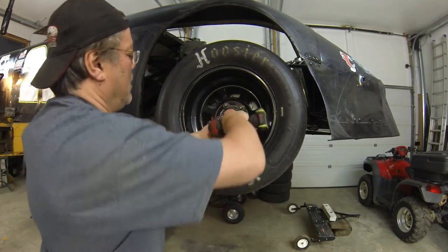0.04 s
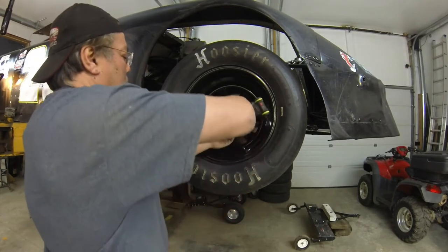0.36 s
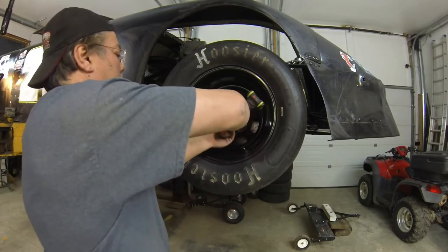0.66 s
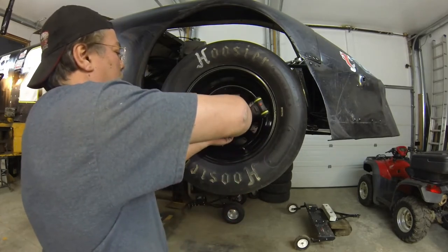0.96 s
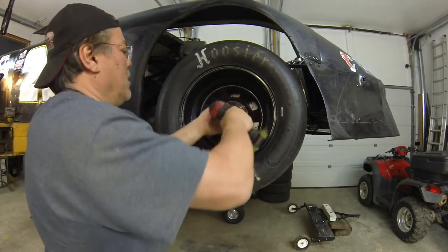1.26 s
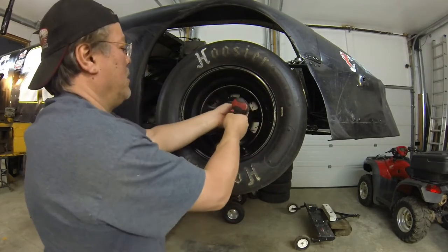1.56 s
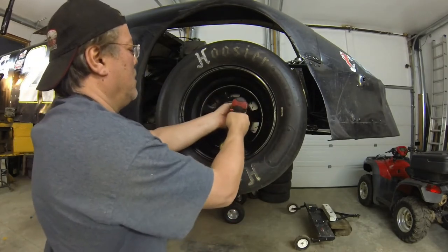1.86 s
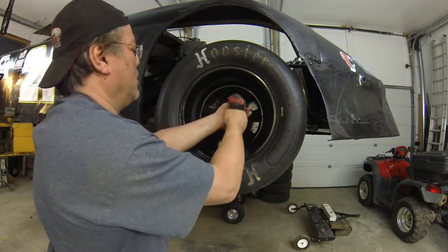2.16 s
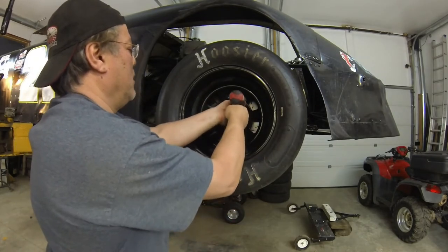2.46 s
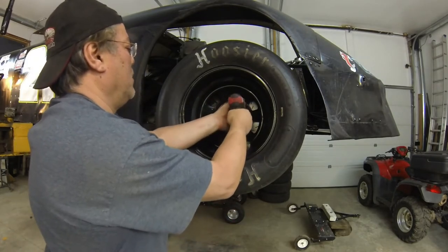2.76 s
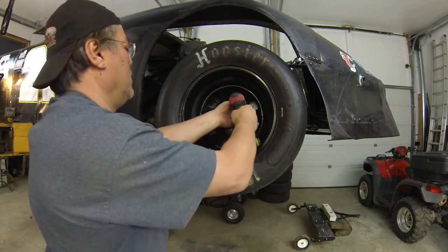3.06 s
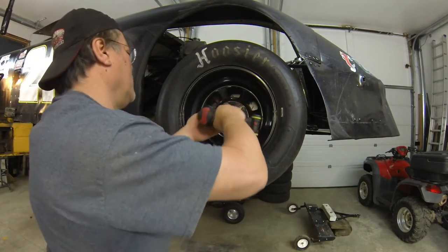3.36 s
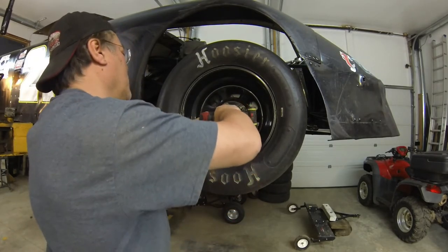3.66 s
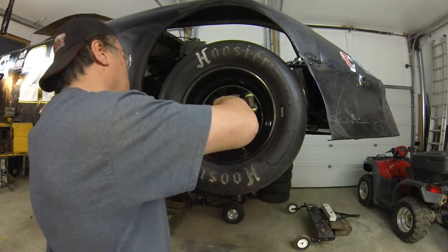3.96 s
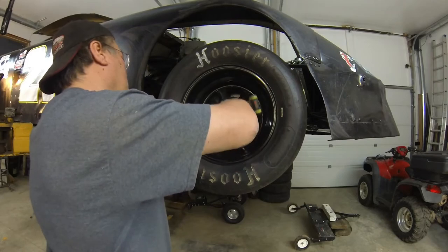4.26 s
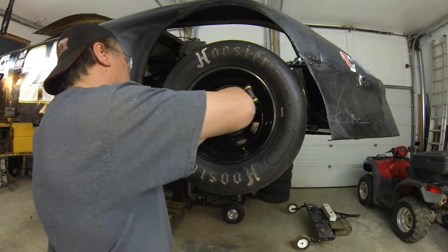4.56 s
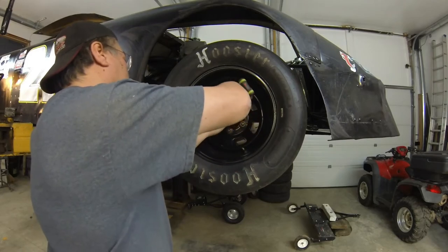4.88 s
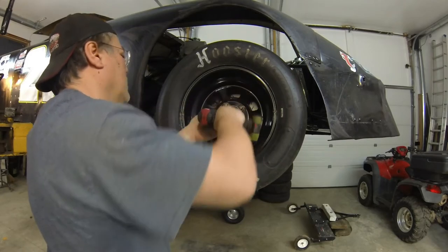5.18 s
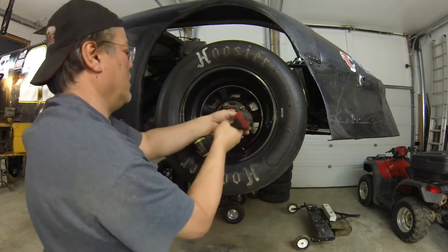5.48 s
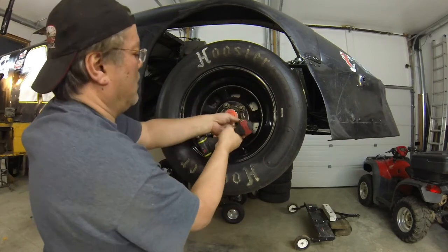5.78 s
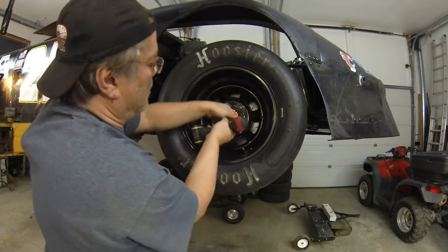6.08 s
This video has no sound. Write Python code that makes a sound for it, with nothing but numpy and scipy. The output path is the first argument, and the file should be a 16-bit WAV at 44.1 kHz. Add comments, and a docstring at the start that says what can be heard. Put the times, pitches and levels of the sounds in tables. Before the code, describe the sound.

Close to a steel car wheel in a quiet, reverberant garage, a metal socket knocks onto a lug nut, and a cordless impact wrench whirs, rattles and hammers for a moment. This happens three times, about two seconds apart, with ringing clanks, small scrapes and faint taps in between as the tool moves on and the tyre rumbles softly. Finally the socket clatters onto another nut without the motor starting.

```python
"""A garage, one microphone close to a steel car wheel, the room's still air behind it.
A cordless impact wrench runs three lug nuts home. The tyre rumbles as the tool shoves it; the
socket clacks onto each nut and sets the wheel ringing. The gears whine up, the socket rattles,
and the hammer strikes about fifty times a second. The room answers from farther off."""
import sys
import numpy as np
from scipy import signal
from scipy.io import wavfile
from scipy.ndimage import uniform_filter1d

SR = 44100
rng = np.random.default_rng(int(sys.argv[2]) if len(sys.argv) > 2 else 0)


def dump_mix(stems):
    """Bounce the given channels to the path in sys.argv[1] as a 16-bit WAV at rate SR."""
    frames = np.atleast_2d(stems).T  # one column per channel
    limited = np.clip(frames, -1, 1)  # hard clip at full scale
    pcm = np.round(limited * 32767).astype(np.int16)
    wavfile.write(sys.argv[1], SR, pcm)


N = 274726
TIME = np.arange(N) / SR
EDGES = 20 * 2 ** (np.arange(30) / 3)   # third octaves, Hz
CENTRES = np.sqrt(EDGES[1:] * EDGES[:-1])
BANK = [signal.butter(2, pair, "band", fs=SR, output="sos") for pair in zip(EDGES, EDGES[1:])]

# Room tone. Each row: frequency in Hz, density in dB.
AIR_SPECTRUM = [(22, -4), (50, 1.5), (90, 0), (200, -9.5), (400, -20.5), (1000, -26.5), (2500, -30.5),
                (5000, -35), (10000, -42), (12500, -52), (15500, -83)]
# The tool shoves the tyre. Each row: start in seconds, level in dB.
SHOVES = [(0, -39), (.08, -39.5), (.57, -47), (1.58, -42.5), (1.85, -40), (2.22, -49), (2.7, -45),
          (3.64, -43.5), (4.25, -36), (5.79, -34), (6.13, -43)]
# Tyre and hub resonances. Each row: frequency in Hz, width in Hz, gain in dB.
TYRE_MODES = [(78.5, 6.4, 5), (102, 8.6, -1.5), (139, 65, -6), (180, 17, 0.5), (258.8, 13, -6.5),
              (417, 37, -13), (610, 83, -18.5)]

# Socket against nut and wheel. Each row: start in seconds, level, weight and clang in dB,
# clang pitch in Hz, brightness and socket ring in dB.
KNOCKS = [(0.0681, -19, -12, 9.5, 1060, 1, 0.5), (0.1067, -23.5, 0, 5.5, 900, 0, -2.5),
          (0.1234, -29, 8, 6.5, 847, 6.5, -2.5), (.149, -27, 10, -1, 800, 3, -1.5),
          (0.3159, -36.5, 16, 12, 540, -6.5, -11.5), (.528, -55, 1, -5, 757, 4.5, -7),
          (1.5808, -14.5, -17, 9.5, 372, -8.5, -3.5), (1.818, -26, -5, 1, 706, -6, -2),
          (1.853, -35, 5, 4, 701, -7.5, -2.5), (2.461, -43, 0, 3, 760, 1.5, 3.5),
          (2.4705, -27, -5.5, 1, 837, 1, 4.5), (2.4737, -25.5, 4, -5.5, 703, -7.5, -4.5),
          (2.653, -47, 10, -6, 770, 6, 0), (3.6143, -25, -19.5, 14.5, 660, 4, -11.5),
          (3.6272, -26.5, -7.5, 5.5, 680, -1.5, -4), (4.2224, -48, 16, 20.5, 795, -15.5, 6.5),
          (4.2467, -35.5, 13, 13.5, 725, 1.5, 1.5), (4.3534, -31.5, -13, 7, 750, -1, -3),
          (4.471, -57.5, 0.5, -0.5, 759, 13, -1.5), (5.7716, -25.5, -7, 6.5, 760, 1, 6.5),
          (5.7854, -25, 0.5, 11.5, 716, 6, -7.5), (5.8205, -29.5, -2, 10, 696, 8.5, 0),
          (5.8271, -26, -7, -1, 750, 9, -3), (5.903, -43.5, 17.5, 12, 750, -11, -12),
          (6.1412, -52, 30, 11.5, 653, -29, -8)]
# The socket drags over the nut. Each row: start in seconds, level and brightness in dB, base decay in ms.
SCRAPES = [(1.7828, -37.5, 10, 14), (2.4355, -41.5, -11.5, 17)]
# All scrapes share weight and clang in dB, clang pitch in Hz, socket ring in dB.
SCRAPE_TONE = (2, 9, 1000, 1)
# Faint taps as the socket feels for a nut. Each row: start and end in seconds.
FUMBLES = [(2.2, 2.42), (3.95, 4.15), (6.08, 6.2)]
# All taps share these values: a row of KNOCKS without its start.
TAP_TONE = (-63.5, 13, 11, 850, -12, -6)
# Crack of one contact. Each row: frequency in Hz, density in dB.
CLACK_SPECTRUM = [(40, -17), (110, -0.5), (250, 5), (450, 3), (750, 0.5), (1200, -0.5), (1900, -0.5),
                  (2600, -1), (3800, -5), (5200, -10), (7500, -11.5), (10000, -19), (13000, -35),
                  (15500, -34.5)]
# Ringing steel of wheel and socket. Each row: frequency in Hz, level in dB, t60 in seconds.
WHEEL_MODES = [(551, -0.5, 0.19), (632, -1.5, 0.2), (713, -8, 0.45), (740, -3.5, 0.25), (794.6, 4.5, 0.081),
               (902, -2, 0.15), (1070, 0, 0.14), (1210, -7.5, 0.073), (1310, -10, 0.12), (1630, -4, .26),
               (1810, -4.5, 0.31), (1960, -7.5, .14)]
SOCKET_MODES = [(2540, 1, .22), (3300, -2, .25), (3416, 0, .33), (3530, 1, .3), (3800, -2, .27),
                (4850, -3, .13), (5050, 0, .18), (6800, -4, .24), (7140, -4, .23), (8120, -9, .25),
                (9340, -11.5, .1), (14080, -16.5, .22)]

# The room's reverberation. Each row: frequency in Hz, level in dB, t60 in seconds.
GARAGE_REVERB = [(90, -1.5, 2.1), (180, -2.5, 0.74), (397, -5.5, .72), (900, -10.5, 0.8), (1820, -5, 0.8),
                 (3200, -7.5, 0.81), (5240, -6.5, 0.74), (8050, -6.5, 0.42), (11100, -11.5, 0.59),
                 (14000, -10, 0.38)]
# Times in seconds when the tool moves to another place on the wheel.
MOVES = [1.45, 3.5, 5.6]

# The trigger. Each row: pull, release and spin-up time in seconds, whine level in dB.
PULLS = [(.558, .75, .05, -27), (2.687, 2.918, .045, -27), (4.497, 4.9, .075, -17)]
# Gear tones. Each row: multiple of the whine pitch, level in dB.
GEAR_ORDERS = [(1, -1), (1.33, -2), (3, -3), (4, -5)]
# Rattle of the spinning tool. Each row: frequency in Hz, density in dB.
RATTLE_SPECTRUM = [(100, -14), (400, -5), (1200, -2.5), (2400, -2), (3700, 0), (5500, -7), (10000, -12),
                   (13000, -23.5), (15500, -28.5)]

# The nut jolts as it is grabbed and as it seats.
# Each row: start in seconds, level, body and brightness in dB.
JOLTS = [(.568, -18.5, 5.5, -3.5), (.58, -19.5, 8.5, 2.5), (.591, -12.5, -5.5, -3), (.597, -24, 9.5, 0),
         (0.6171, -21.5, 4, -15), (0.634, -13.5, -10, -3.5), (0.7359, -25.5, -4, -0.5),
         (2.706, -15, 10.5, -4.5), (2.7575, -12, 5.5, -6), (2.7648, -19.5, 9, -5), (2.7713, -13, -1, 1),
         (4.512, -17.5, 2.5, -10), (4.521, -13, 9, .5), (4.5338, -12, 3, -1.5), (4.6609, -12, 1.5, -9.5),
         (4.673, -11, -2.5, -7.5)]
# Hammering on the seated nut, one run a pull.
# Each row: first and last blow in seconds, level, body and brightness in dB.
RUNS = [(.6538, 0.7122, -20, -14.5, 0.5), (2.792, 2.912, -20.5, 3.5, 2.5), (4.69, 4.862, -19.5, 1, 2.5)]
# Crack of one blow. Each row: frequency in Hz, density in dB.
BLOW_SPECTRUM = [(40, -28), (130, -20), (400, -11.5), (800, -10.5), (1200, -6.5), (1900, -4), (2700, 4),
                 (3800, -4), (5000, -5), (7000, -9), (10000, -9.5), (12500, -21.5), (15500, -32)]
BLOWS_PER_S = 51


def from_db(db):
    """Decibels to gain."""
    return 10 ** (np.asarray(db) / 20)


def rms_one(x):
    """Scale each row to rms 1."""
    return x / np.sqrt(np.mean(x ** 2, axis=-1, keepdims=True) + 1e-30)


def at_hz(points, hz, column=1):
    """Read one column of a table on a log-frequency axis."""
    points = np.array(points)
    return np.interp(np.log(hz), np.log(points[:, 0]), points[:, column])


def band(x, k):
    """Third-octave band k of x, with the power that white noise of rms 1 has there."""
    return rms_one(signal.sosfilt(BANK[k], x + 1e-18)) * np.sqrt(2 * (EDGES[k + 1] - EDGES[k]) / SR)


def coloured(noises, spectrum):
    """Shape two unrelated noises, dealt in turn to neighbouring bands; rms 1."""
    bands = (from_db(at_hz(spectrum, hz)) * band(noises[k % 2], k) for k, hz in enumerate(CENTRES))
    return rms_one(sum(bands))


def place(times, sounds):
    """Lay sounds on the time line."""
    out = np.zeros(N)
    for s, sound in zip(times, sounds):
        i = round(s * SR)
        out[i:i + len(sound)] += sound[:N - i]
    return out


def below(hz, corner_hz):
    """Smooth shelf: 1 under the corner, 0 above."""
    return 1 / (1 + (hz / corner_hz) ** 4)


def around(hz, centre_hz):
    """Smooth bump, about an octave wide: 1 at the centre, 0 far from it."""
    return np.exp(-2 * (2 * np.log2(hz / centre_hz)) ** 2 / np.pi)


def settle(start_s, time_s):
    """0 until the start, then an exponential approach to 1."""
    return 1 - np.exp(-np.maximum(TIME - start_s, 0) / time_s)


def room_tone(level_db=-57):
    """The still air of the garage: a low, steady hush all round the microphone."""
    return from_db(level_db) * coloured(rng.standard_normal((2, N)), AIR_SPECTRUM)


def tyre(rumble_db=-2, rise_s=.0089, fade_db_per_s=30):
    """Each shove stirs the low resonances of tyre and hub; the rumble swells quickly and fades."""
    rumble, power = 0, 0
    for hz, width_hz, db in TYRE_MODES:
        resonance = signal.iirpeak(hz, hz / width_hz, fs=SR)
        rumble += from_db(db) * signal.lfilter(*resonance, rng.standard_normal(N))
    rumble = signal.sosfilt(signal.butter(2, 55, "high", fs=SR, output="sos"), rumble)
    for s, db in SHOVES:
        fading = from_db(db - fade_db_per_s * np.maximum(TIME - s, 0))
        power += (settle(s, rise_s) * fading) ** 2
    return from_db(rumble_db) * np.sqrt(power) * rms_one(rumble)


def cracks(times, colour_db, decay_ms, linger_hz, damping, rise_ms=.3, size=4096):
    """Each impact excites a thicket of fast-dying modes; the low ones linger."""
    ms, out = np.arange(size) / SR * 1e3, 0
    for k, hz in enumerate(CENTRES):
        life_ms = np.maximum(decay_ms, .3)[:, None] * (1 + linger_hz / hz)
        envelope = (1 - np.exp(-ms / rise_ms)) * np.exp(-np.minimum(ms / life_ms, 20) ** damping)
        burst = band(rng.standard_normal((len(times), size)) * envelope, k) / np.sqrt(size)
        out += burst * from_db(colour_db(hz))[:, None]
    return place(times, out)


def ringing(times, strike_db, modes):
    """Struck steel rings on; every touch strikes each mode with a strength and sign of its own."""
    out, shape = np.zeros(N), (len(times), len(modes))
    strengths = from_db(2 * rng.standard_normal(shape)) * rng.choice([-1, 1], shape)
    for (hz, db, t60), strength in zip(modes, strengths.T):
        radius, angle = from_db(-60 / (t60 * SR)), 2 * np.pi * hz / SR
        clicks = place(times, (strength * from_db(db + strike_db(hz)))[:, None])
        feedback = [1, -2 * radius * np.cos(angle), radius ** 2]
        out += signal.lfilter([0, np.sin(angle)], feedback, clicks + 1e-18)
    return out


def contact_rows(decay_ms=2.8, tap_gap_s=.075):
    """Knocks, scrapes and unevenly spaced taps, as rows like KNOCKS plus a base decay in ms."""
    weight, clang, clang_hz, ring = SCRAPE_TONE
    knocks = [(*row, decay_ms) for row in KNOCKS]
    scrapes = [(s, level, weight, clang, clang_hz, bright, ring, ms) for s, level, bright, ms in SCRAPES]
    tap_times = np.concatenate([np.arange(start, end, tap_gap_s) for start, end in FUMBLES])
    taps = [(s + tap_gap_s * rng.random() / 2, *TAP_TONE, decay_ms) for s in tap_times]
    return knocks + scrapes + taps


def socket_contacts(crack_db=35, wheel_db=-15, socket_db=-23):
    """The socket knocks on the nut: a crack, then wheel and socket ring on."""
    times, level, weight, clang, clang_hz, bright, ring, decay_ms = np.transpose(contact_rows())

    def force_db(hz):
        """Heavy knocks add bass, sharp ones treble; the spot struck picks the pitch of the clang."""
        bass, treble = weight * below(hz, 430), bright * (1 - below(hz, 3400))
        return level + bass + clang * around(hz, clang_hz) + treble

    crack = cracks(times, lambda hz: crack_db + force_db(hz) + at_hz(CLACK_SPECTRUM, hz),
                   decay_ms, linger_hz=250, damping=.78)
    wheel = ringing(times, lambda hz: wheel_db + force_db(hz), WHEEL_MODES)
    socket = ringing(times, lambda hz: socket_db + level + ring, SOCKET_MODES)
    return crack + wheel + socket


def garage_echo(x, build_s=.003, early_db=-11, early_s=.0049, gap_s=.003):
    """Wheel arch and floor reach the microphone first; the diffuse tail swells and dies band by band."""
    t, tail = TIME[:SR], 0
    swelling = (1 - np.exp(-t / build_s)) * (t > gap_s)
    for k, hz in enumerate(CENTRES):
        dying = from_db(-60 * t / at_hz(GARAGE_REVERB, hz, column=2))
        tail += from_db(at_hz(GARAGE_REVERB, hz)) * band(rng.standard_normal(SR) * dying * swelling, k)
    early = rms_one(rng.standard_normal(SR) * (t > gap_s) * np.exp(-t / early_s))
    return signal.fftconvolve(x, (tail + from_db(early_db) * early) / np.sqrt(SR))


def drive(start_hz=550, free_hz=2300, loaded_hz=1750, bog_s=.03, brake_s=.022):
    """Whine pitch, whine gain and rattle gain: the motor spins up, bogs down on the nut and brakes."""
    db_per_octave, loaded_db = 13, -14   # the whine grows with speed and sinks under load
    rattle_db, rattle_rise_s = -29, .006
    grab_s, grab_db = .046, 6.5   # the socket rattles hardest just after it grabs the nut
    controls = np.zeros((3, N))
    for (pull, release, spin_up_s, whine_db), (first_blow, *_) in zip(PULLS, RUNS):
        load = settle(first_blow - 1 / BLOWS_PER_S, bog_s)
        power = (1 - settle(release, brake_s)) * (TIME > pull)
        unloaded_hz = start_hz + (free_hz - start_hz) * settle(pull, spin_up_s)
        hz = unloaded_hz + (loaded_hz - unloaded_hz) * load
        whine = from_db(whine_db + db_per_octave * np.log2(hz / free_hz) + loaded_db * load)
        grab = np.exp(-(2 * (TIME - pull - grab_s) / grab_s) ** 2)
        rattle = from_db(rattle_db + grab_db * grab) * settle(pull, rattle_rise_s) ** 2
        controls += np.array([hz, whine, rattle]) * power
    return controls


def motor(grain_db=3.5, housing_hz=2200, housing_db=14):
    """Gears whine with the motor's speed while the spinning socket chatters on the nut."""
    whine_hz, whine_gain, rattle_gain = drive()
    unsteady = .014 * rms_one(uniform_filter1d(rng.standard_normal(N), size=90))
    phase = 2 * np.pi * np.cumsum(whine_hz * (1 + unsteady)) / SR
    whine = 0
    for order, db in GEAR_ORDERS:
        # a tone swells as it sweeps through the resonance of the gear housing
        in_tune = 1 / (1 + ((order * whine_hz - housing_hz) / 330) ** 2)
        whine += from_db(db + housing_db * (in_tune - 1)) * np.sin(order * phase)
    chatter = from_db(grain_db * rms_one(uniform_filter1d(rng.standard_normal(N), size=60)))
    rattle = coloured(rng.standard_normal((2, N)) * chatter, RATTLE_SPECTRUM)
    return whine_gain * whine * np.sqrt(chatter) + rattle_gain * rattle


def blow_rows(jolt_decay_ms=2.9, blow_decay_ms=1.8, jitter_s=.0007, scatter_db=3.5):
    """Jolts, then steady runs of blows of uneven strength, as rows like JOLTS plus a base decay in ms."""
    rows = [(*jolt, jolt_decay_ms) for jolt in JOLTS]
    for first, last, level, body, bright in RUNS:
        for s in np.linspace(first, last, round((last - first) * BLOWS_PER_S) + 1):
            late, harder = rng.uniform(-1, 1, 2)
            rows.append((s + jitter_s * late, level + scatter_db * harder, body, bright, blow_decay_ms))
    return rows


def hammer(crack_db=35, wheel_db=-27, socket_db=-29):
    """The hammer hits the anvil in a quick run; the socket passes each blow on to the wheel."""
    times, level, body, bright, decay_ms = np.transpose(blow_rows())

    def force_db(hz):
        """Blows that jolt the nut have more body; on a tight nut the anvil rings instead."""
        return level + body * (below(hz, 1300) - .26 * around(hz, 2550)) + bright * (1 - below(hz, 3900))

    crack = cracks(times, lambda hz: crack_db + force_db(hz) + at_hz(BLOW_SPECTRUM, hz),
                   decay_ms, linger_hz=400, damping=1.1)
    wheel = ringing(times, lambda hz: wheel_db + force_db(hz), WHEEL_MODES)
    socket = ringing(times, lambda hz: socket_db + level, SOCKET_MODES)
    return crack + wheel + socket


def scene():
    """Tool and wheel up close, the room behind, in mono; each place of the tool has its own echoes."""
    direct = socket_contacts() + hammer() + motor()
    stretches = np.split(direct, [round(s * SR) for s in MOVES])
    echoes = place([0] + MOVES, [garage_echo(stretch) for stretch in stretches])
    return (direct + echoes + room_tone() + tyre())[None]


def record(dry):
    """Behind the microphone, the loudest peaks are rounded at full scale and the top is cut."""
    cutoff_hz = 15400
    rounded = dry / (1 + dry ** 4) ** .25
    return signal.sosfilt(signal.ellip(10, .2, 80, cutoff_hz, fs=SR, output="sos"), rounded)


dry = scene()
out = record(dry)
dump_mix(out)
```